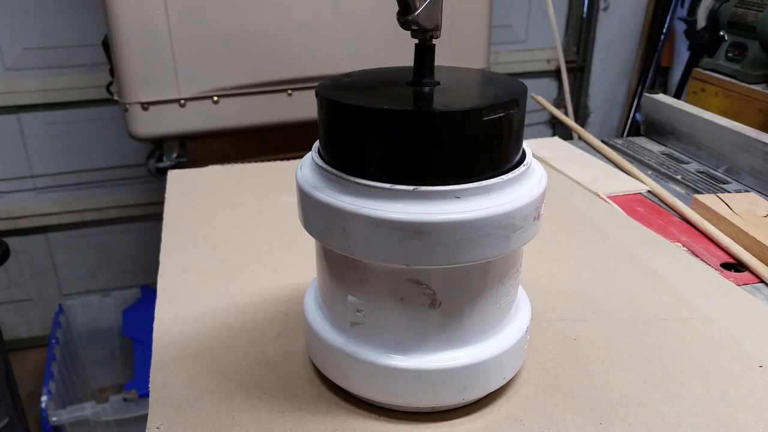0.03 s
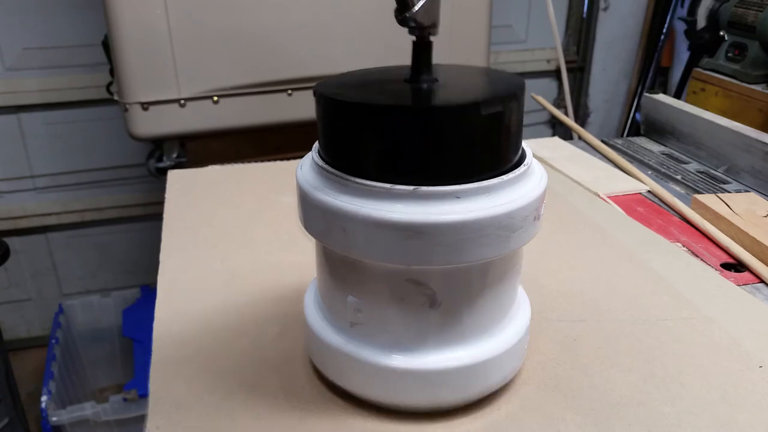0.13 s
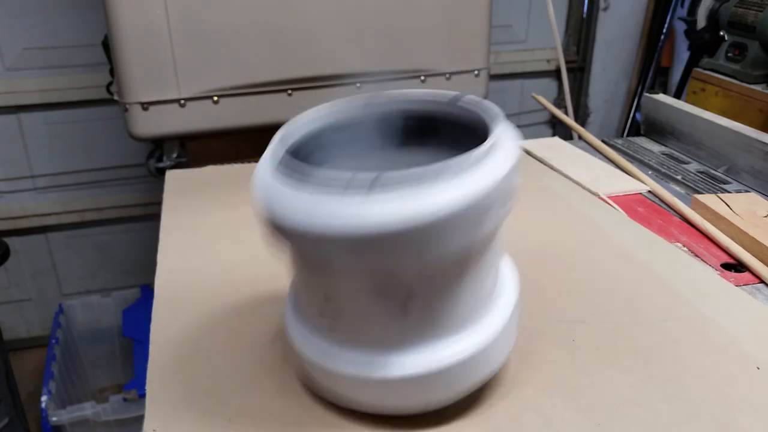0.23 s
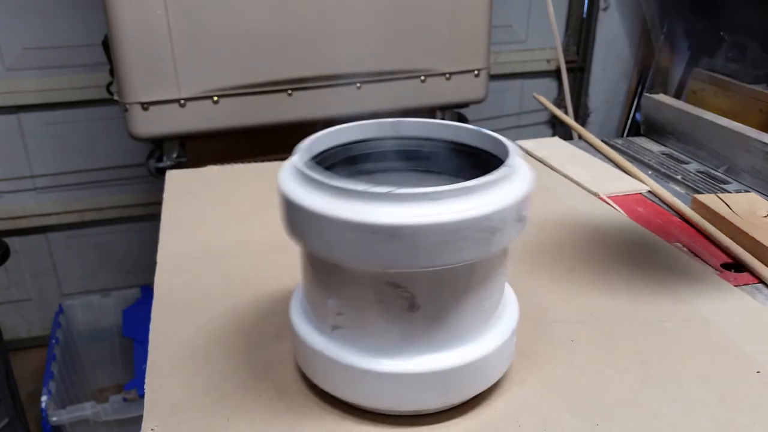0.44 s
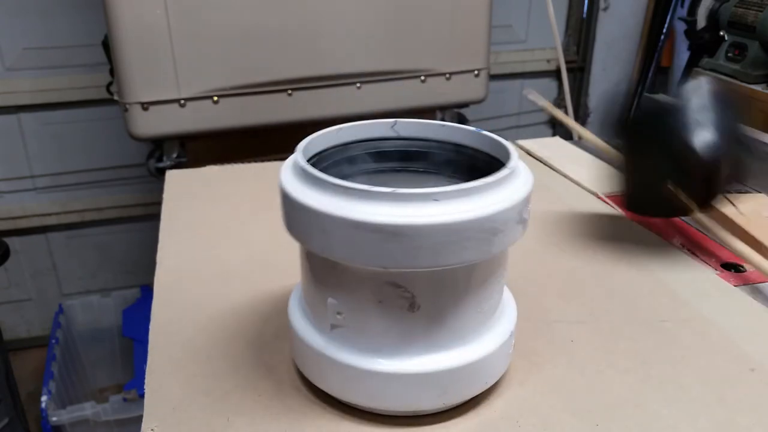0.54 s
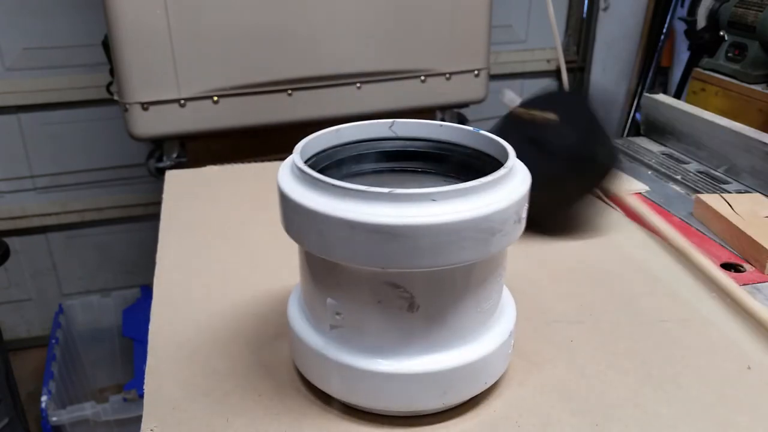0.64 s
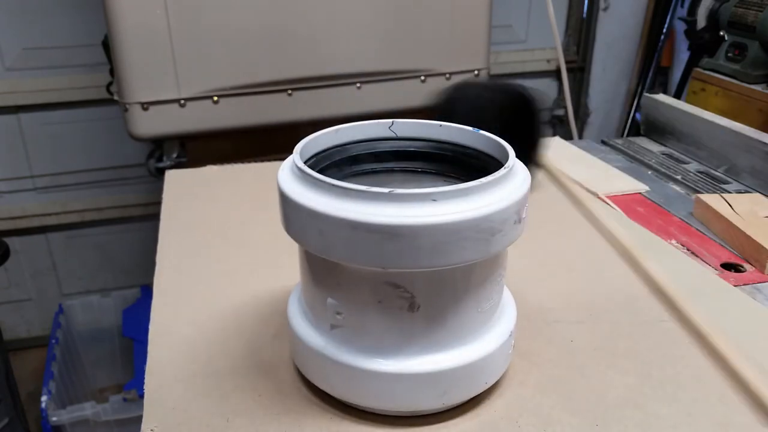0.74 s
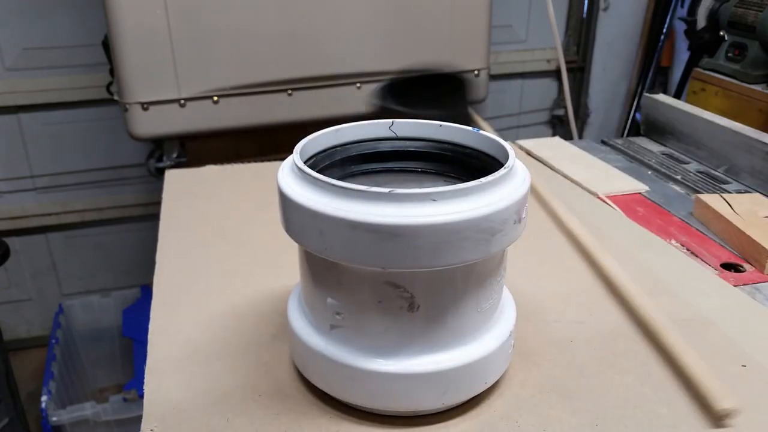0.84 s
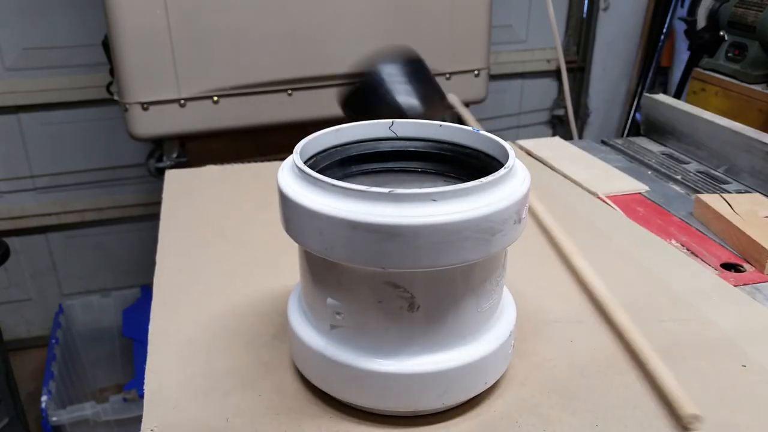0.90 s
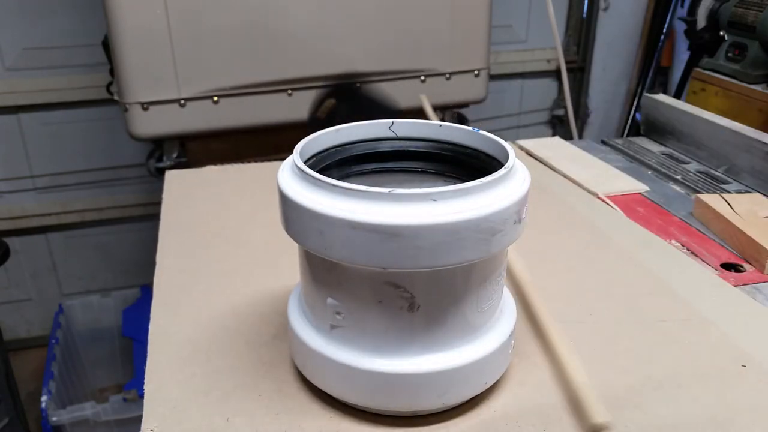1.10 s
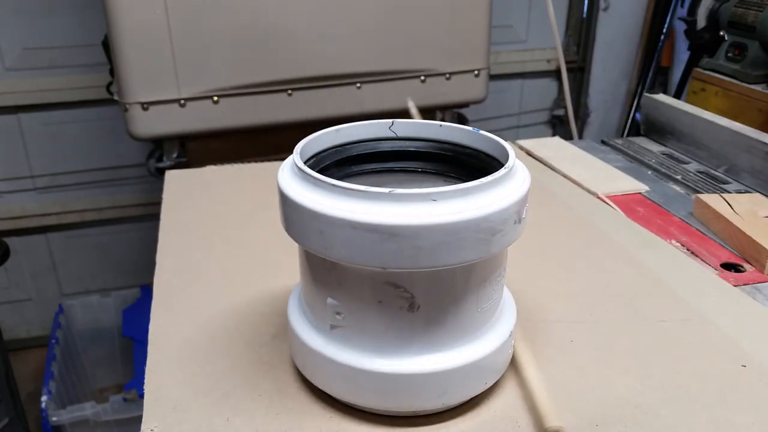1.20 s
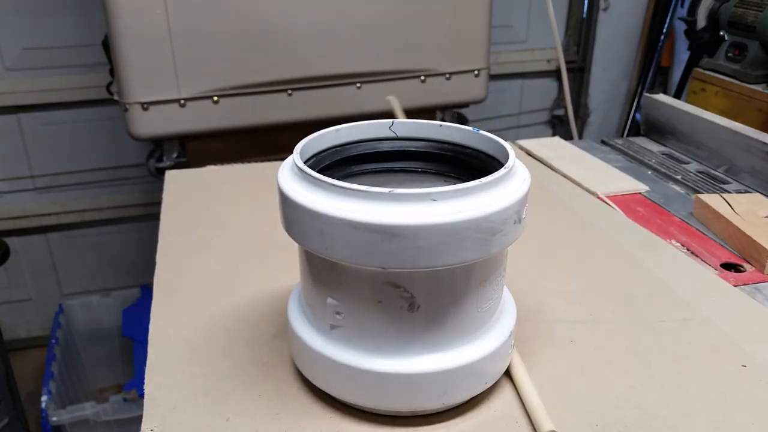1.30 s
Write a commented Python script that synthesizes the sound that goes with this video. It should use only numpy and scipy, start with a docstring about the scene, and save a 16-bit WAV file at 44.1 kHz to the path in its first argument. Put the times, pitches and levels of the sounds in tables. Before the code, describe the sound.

A loud air pop from a plastic pipe is the main sound. Air hisses over a faint rumble until the plug bursts out at about 0.2 seconds, overloading the microphone. Air rushes on until 0.4. Uneven knocks and clacks of plug, pipe and a wooden rod on a workbench follow, strongest near 0.6, 0.8 and 1.1, fading to light taps by 1.3 with a short workshop echo.

```python
"""Air hisses past a plug in a short plastic pipe, which rumbles under the pressure. At 0.23 s the plug
shoots out with a pop that overloads the microphone. The pipe jumps and slaps the bench; the air line
blows on through it until 0.4 s. At 0.38 s the plug strikes something in the small workshop. The pipe
rocks back on the bench, then the plug bounces over the bench, knocking a wooden rod along."""
import sys
import numpy as np
from scipy import signal
from scipy.fft import rfft, irfft, next_fast_len
from scipy.io import wavfile

SR = 44100
rng = np.random.default_rng(int(sys.argv[2]) if len(sys.argv) > 2 else 0)


def transcribe(signal):
    """Save signal, clipped to [-1, 1], as a 16-bit WAV file at the path in sys.argv[1]."""
    frames = np.atleast_2d(signal).T
    limited = np.clip(frames, -1, 1)
    pcm = np.round(limited * 32767).astype(np.int16)
    wavfile.write(sys.argv[1], SR, pcm)


N = 59535
T = np.arange(N) / SR
FFT_SIZE = 2 * next_fast_len(N)
HZ = np.maximum(np.fft.rfftfreq(FFT_SIZE, 1 / SR), 1)

# Workshop reverb. Each row: frequency in Hz, t60 in seconds, left-right likeness from 0 to 1.
ROOM_DECAY = [(80, 1, 0.1), (266, 0.44, 1), (600, 0.3, 1), (1500, 0.41, 0), (4000, 0.34, 0), (7850, .32, 0),
              (15000, 0.26, .1)]
# Workshop background. Each row: frequency in Hz, relative density in dB.
FLOOR_SPECTRUM = [(25, -2), (55, 0.5), (95, 8), (200, -5), (400, -8.5), (900, -17), (2000, -31.5),
                  (3500, -33), (4600, -23), (5500, -41.5), (8000, -46), (16000, -58)]
# Pipe under pressure. Each row: frequency in Hz, relative density in dB.
RUMBLE_SPECTRUM = [(30, -6), (85, -3), (150, -8), (215, -3.5), (330, -18.5), (700, -21), (2000, -44.5)]
# Rumble envelope. Each row: time in seconds, level in dB.
RUMBLE_ENVELOPE = [(0, -40), (.07, -37), (.14, -43), (.19, -39), (.23, -59)]
# Leak past the seal. Each row: frequency in Hz, relative density in dB.
LEAK_SPECTRUM = [(300, -14.5), (900, -11.5), (1650, -7.5), (2250, -17.5), (3400, -12), (5000, -13.5),
                 (6600, -12.5), (8200, -17), (11500, -7), (13000, -9), (15000, -4.5)]
# Pressure wave of the pop. Each row: frequency in Hz, relative density in dB.
BLAST_SPECTRUM = [(25, -24), (45, -16.5), (62, -24.5), (90, -16), (160, -0.5), (260, 1.5), (380, 6.5),
                  (570, -2), (680, -13.5), (1100, -25.5), (2500, -26.5), (6000, -39), (15000, -67)]
# Seal letting go, pipe landing. Each row: start in seconds, level in dB, t60 in seconds.
CRACK_EVENTS = [(0.2318, -9, 0.0065), (.235, -15.5, .04), (0.2467, -19.5, 0.032), (0.2491, -23, 0.019)]
# Colour of those cracks. Each row: frequency in Hz, relative density in dB.
CRACK_SPECTRUM = [(300, -11.5), (1400, 5.5), (3000, 5.5), (5500, -16), (9000, -18), (15000, -9.5)]
# Boom of pipe, bench and room. Each row: frequency in Hz, level in dB, t60 in seconds.
BOOM_MODES = [(47, -34, 0.24), (83.6, -18, 0.36), (108, -19, 0.47), (161.5, -9.5, 0.21), (212.5, -14, 0.51),
              (267.9, -14.5, 0.27), (344.6, -6, 0.21), (392, -7, 0.17), (439.8, -14, .26),
              (495, -20.5, 0.29), (529, -15.5, 0.11), (572, -18.5, .34)]
# Pipe resonances in the outrush. Each row: frequency in Hz, width in Hz, relative gain in dB.
PIPE_MODES = [(1650, 82, 12.5), (2610, 170, -11), (3480, 350, 4.5), (4280, 240, 4), (6030, 190, 6.5)]
# Open air line. Each row: frequency in Hz, relative density in dB.
JET_SPECTRUM = [(1000, -8), (3000, -2.5), (6500, -15), (9000, -7.5), (12000, 2), (14500, 9), (16000, 7.5)]
# Low roar in the open pipe. Each row: frequency in Hz, relative density in dB.
ROAR_SPECTRUM = [(60, -23), (110, -5), (170, 1), (300, -5), (560, -0.5), (680, -24), (1500, -26.5),
                 (4000, -50)]
# Bench top. Each row: frequency in Hz, relative level in dB, t60 in seconds.
BENCH_MODES = [(140, -5, .08), (172, 1, .13), (216, 0, .13), (285, -10, .06), (346, -3, .11),
               (450, -5, .08), (505, -6, .09), (790, -6, .05), (980, -7, .06)]
# Knocks of plug, pipe and rod on the bench. Each row: start in seconds, thud level in dB,
# clack level in dB, clack low cut in Hz, clack high cut in Hz.
KNOCK_EVENTS = [(.380, -33.5, -39, 730, 3900), (0.418, -30.5, -56, 200, 1200),
                (0.508, -43.5, -70, 694, 2940), (.5660, -45, -28, 833, 11500), (.573, -44, -26, 1110, 9050),
                (.578, -24, -32, 1170, 7200), (0.71, -37.5, -60, 3460, 15000),
                (0.721, -43, -59, 2460, 9000), (0.7336, -44.5, -41.5, 426, 1920),
                (0.798, -66, -43, 600, 1810), (0.823, -28.5, -29.5, 203, 940),
                (.8295, -35.5, -37, 626, 5210), (.913, -45, -50, 1190, 2920), (0.919, -57, -41, 870, 2420),
                (.929, -34.5, -49, 300, 2000), (.9600, -39, -45, 1610, 4180),
                (0.9817, -41.5, -57, 1600, 4100), (0.991, -43.5, -49, 496, 1990),
                (1.0818, -38, -33.5, 483, 2320), (1.089, -29.5, -41.5, 403, 4700),
                (1.246, -55.5, -60.5, 489, 2440), (1.336, -52.5, -53, 622, 2640)]
# Hard contact. Each row: frequency in Hz, relative density in dB.
CLACK_SPECTRUM = [(100, -11.5), (300, 29.5), (620, 1.5), (1050, 1.5), (1650, 0), (2500, -6), (4000, -11.5),
                  (6500, -15.5), (8700, -26), (15000, -16.5)]
# Two microphone ports. Each row: frequency in Hz, left minus right in dB.
PORT_BALANCE = [(110, 0), (200, -0.3), (380, 2.5), (700, 5), (1300, 6), (2400, 6.5), (4000, 15.5),
                (5800, 16), (7500, 11), (9200, -3), (15000, -8.5)]

SLIDE_S, POP_S, SLAP_S, AIR_OFF_S = 0.213, 0.2312, 0.247, 0.386
LEAK_FADE_S, JET_FADE_S = 0.0054, 0.013


def undb(db):
    """Decibels to gain."""
    return 10 ** (np.asarray(db) / 20)


def lookup(hz, table, column=1):
    """Table column, interpolated over log frequency."""
    table = np.array(table)
    return np.interp(np.log(hz), np.log(table[:, 0]), table[:, column])


def set_rms(x, db):
    """Scale to an rms level."""
    return x * undb(db) / np.sqrt(np.mean(x ** 2))


def set_energy(x, db):
    """Scale a transient to the energy of 10 ms at this level."""
    return x * undb(db) / np.sqrt(np.sum(x ** 2) / (SR * 0.01))


def response(gain_db):
    """Minimum-phase impulse response from gains on the HZ grid."""
    cepstrum = irfft(np.log(undb(gain_db)))
    cepstrum[1:FFT_SIZE // 2] *= 2
    cepstrum[FFT_SIZE // 2 + 1:] = 0
    return irfft(np.exp(rfft(cepstrum)))[:N]


def convolve(x, ir):
    """FFT convolution, cut to N samples."""
    return irfft(rfft(x, FFT_SIZE) * rfft(ir, FFT_SIZE))[..., :N]


def noise(spectrum):
    """Noise with this spectrum."""
    return convolve(rng.standard_normal(N), response(lookup(HZ, spectrum)))


def decay(t60_s):
    """Exponential decay."""
    return np.exp(-np.log(1000) * T / t60_s)


def ring(modes):
    """Damped modes struck together."""
    return sum(undb(db) * decay(t60_s) * np.sin(2 * np.pi * hz * T) for hz, db, t60_s in modes)


def at(start_s, x):
    """Delay a sound to its start."""
    return np.concatenate([np.zeros(int(np.clip(start_s * SR, 0, N))), x])[:N]


def until(hold_s, fade_s):
    """Hold, then fade linearly."""
    return np.clip(1 - (T - hold_s) / fade_s, 0, 1)


def spread(x, crossover_hz=1800):
    """Mono to stereo: the ports hear bass alike, treble differently."""
    scatter = set_energy(rng.standard_normal(N) * decay(0.004), 0) / np.sqrt(SR * 0.01)
    side_share = HZ ** 2 / (HZ ** 2 + crossover_hz ** 2) / 2
    mid = convolve(x, response(10 * np.log10(1 - side_share)))
    side = convolve(convolve(x, scatter), response(10 * np.log10(side_share + 0.001)))
    return mid + np.array([side, -side])


def workshop(build_s=0.0034, early_boost=0.95, early_s=0.026):
    """Stereo room response: strong early reflections, then a tail that lasts longest in the bass."""
    room = 0
    edges_hz = np.r_[0, 90 * 2 ** np.arange(0, 8.1, 0.5)]
    onset = (1 - np.exp(-T / build_s)) * (1 + early_boost * np.exp(-T / early_s))
    for low_hz, high_hz in zip(edges_hz, edges_hz[1:]):
        in_band = (HZ >= low_hz) & (HZ < high_hz)
        mid, side = irfft(rfft(rng.standard_normal((2, FFT_SIZE))) * in_band)[:, :N]
        likeness = lookup(high_hz, ROOM_DECAY, column=2)
        band = np.sqrt(1 + likeness) * mid + np.sqrt(1 - likeness) * np.array([side, -side])
        band *= onset * decay(lookup(high_hz, ROOM_DECAY))
        energy_share = (high_hz - low_hz) / (SR / 2)
        room = room + band * np.sqrt(energy_share / np.sum(band ** 2, axis=1, keepdims=True))
    return room


def background(level_db=-53.5, side_gain_db=-22):
    """Steady low room noise with a faint band of hiss."""
    mid, side = (set_rms(noise(FLOOR_SPECTRUM), level_db) for _ in range(2))
    return mid + undb(side_gain_db) * np.array([side, -side])


def rumble():
    """The pipe rumbles under pressure until the pop."""
    envelope_db = np.interp(T, *np.array(RUMBLE_ENVELOPE).T)
    return set_rms(noise(RUMBLE_SPECTRUM), 0) * undb(envelope_db) * until(POP_S, LEAK_FADE_S)


def leak(room, level_db=-32.5, wet_db=-15):
    """Air hisses past the seal until the plug slides."""
    hiss = np.array([set_rms(noise(LEAK_SPECTRUM), level_db) for _ in range(2)])
    hiss *= until(SLIDE_S, LEAK_FADE_S)
    return hiss + convolve(undb(wet_db) * hiss, room)


def pop(room, swell_db=-20, swell_s=0.005, boom_lag_s=0.0028, blast_wet_db=1, crack_wet_db=-22.5,
        cavity_hz=457.3, cavity_db=10.5, cavity_t60_s=0.028, slap_db=-10.5):
    """Swell as the plug slides, then blast, cracks, ringing cavity and the pipe's slap on the bench."""
    swell = at(POP_S - swell_s, undb(swell_db) * np.sin(np.pi * np.minimum(T / swell_s, 1)))
    blast = at(POP_S, set_energy(response(lookup(HZ, BLAST_SPECTRUM)), db=0))
    cavity = ring([(cavity_hz, cavity_db, cavity_t60_s)])
    boom = at(POP_S + boom_lag_s, -(cavity + ring(BOOM_MODES)))
    slap = at(SLAP_S, set_energy(bench(), slap_db))
    cracks = sum(at(start_s, set_energy(noise(CRACK_SPECTRUM) * decay(t60_s), db))
                 for start_s, db, t60_s in CRACK_EVENTS)
    reverb = convolve(undb(blast_wet_db) * blast + undb(crack_wet_db) * cracks, room)
    return swell + spread(blast + boom + slap + cracks) + reverb


def outrush(room, pipe_db=-34.5, pipe_db_per_s=-105.5, jet_db=-45.5, wet_db=-9.5):
    """Escaping air sounds the pipe's resonances, fading; the line hisses on until shut off."""
    resonances = sum(undb(db) / (1 + 1j * (HZ ** 2 - hz ** 2) / (HZ * width_hz))
                     for hz, width_hz, db in PIPE_MODES)
    ports = []
    for room_channel in room:
        pipe = irfft(rfft(rng.standard_normal(FFT_SIZE)) * resonances)[:N]
        pipe = set_rms(pipe, pipe_db) * undb(pipe_db_per_s * T)
        jet = set_rms(noise(JET_SPECTRUM), jet_db)
        flow = at(POP_S, pipe + jet) * until(AIR_OFF_S, JET_FADE_S)
        ports.append(flow + convolve(undb(wet_db) * flow, room_channel))
    return np.array(ports)


def roar(start_db=-15.5, db_per_s=-83):
    """Low, fading roar of air through the open pipe."""
    flow = set_rms(noise(ROAR_SPECTRUM), start_db) * undb(db_per_s * T)
    return at(POP_S, flow) * until(AIR_OFF_S, JET_FADE_S)


def bench(detune=0.04, scatter_db=2.5, low_hz=115, high_hz=1500):
    """Bench top struck at one random spot; radiates little bass or treble."""
    modes = [(hz * (1 + rng.normal(0, detune)), db + rng.normal(0, scatter_db), t60_s)
             for hz, db, t60_s in BENCH_MODES]
    loss_db = 10 * np.log10((1 + (low_hz / HZ) ** 6) * (1 + (HZ / high_hz) ** 4))
    return convolve(ring(modes), response(-loss_db))


def knocks(room, clack_t60_s=0.036, tick_gain_db=-9.5, thud_wet_db=-5.5, clack_wet_db=-1):
    """Knocks of plug, pipe and rod: each ticks, clacks and rings the bench top."""
    thuds, clacks = 0, 0
    bench_ring = bench()
    for start_s, thud_db, clack_db, low_hz, high_hz in KNOCK_EVENTS:
        loss_db = 10 * np.log10((1 + (HZ / high_hz) ** 6) * (1 + (low_hz / HZ) ** 4))
        contact = response(lookup(HZ, CLACK_SPECTRUM) - loss_db)
        tick = set_energy(contact, clack_db + tick_gain_db)
        burst = rng.standard_normal(N) * decay(clack_t60_s)
        clack = set_energy(convolve(burst, contact), clack_db)
        clacks = clacks + at(start_s, tick + clack)
        thuds = thuds + at(start_s, set_energy(bench_ring, thud_db))
    reverb = convolve(undb(thud_wet_db) * thuds + undb(clack_wet_db) * clacks, room)
    return spread(thuds + clacks) + reverb


def scene():
    """All sources in one workshop."""
    room = workshop()
    air = rumble() + leak(room) + outrush(room) + roar()
    return air + pop(room) + knocks(room) + background()


def record(dry, ceiling=0.82, knee=6, cutoff_hz=15900):
    """Port colouring, soft clipping of the pop, steep low-pass."""
    lean_db = lookup(HZ, PORT_BALANCE) / 2
    coloured = convolve(dry, np.array([response(lean_db), response(-lean_db)]))
    clipped = coloured / (1 + np.abs(coloured / ceiling) ** knee) ** (1 / knee)
    return signal.sosfilt(signal.ellip(10, 0.1, 80, cutoff_hz, fs=SR, output="sos"), clipped)


dry = scene()
out = record(dry)
transcribe(out)
```